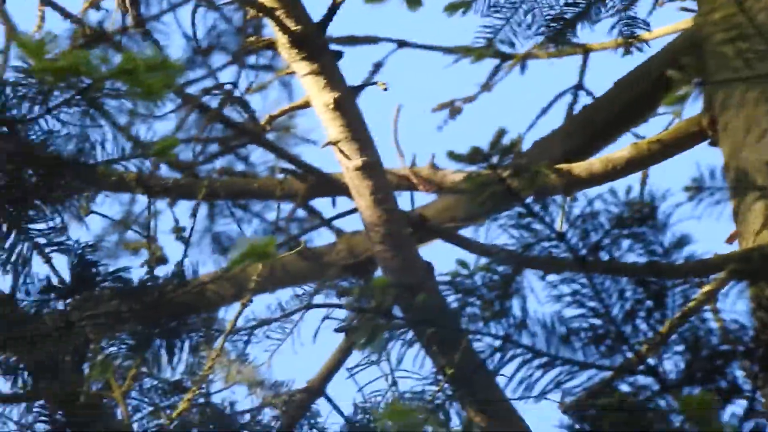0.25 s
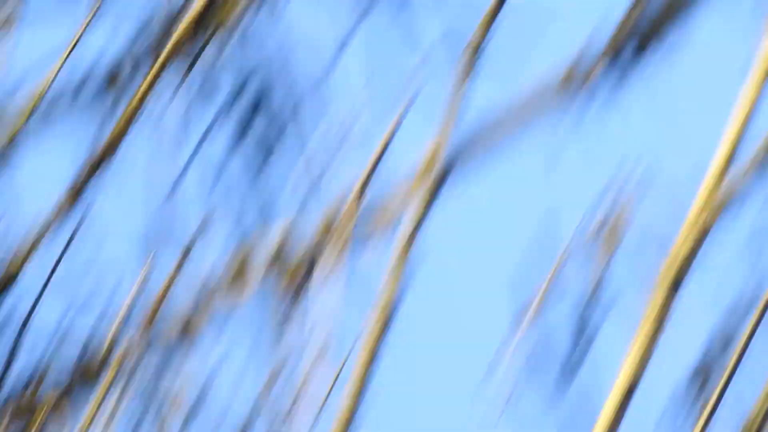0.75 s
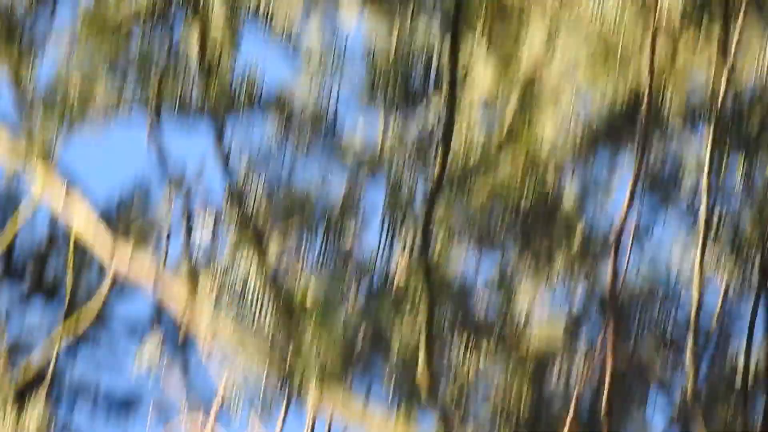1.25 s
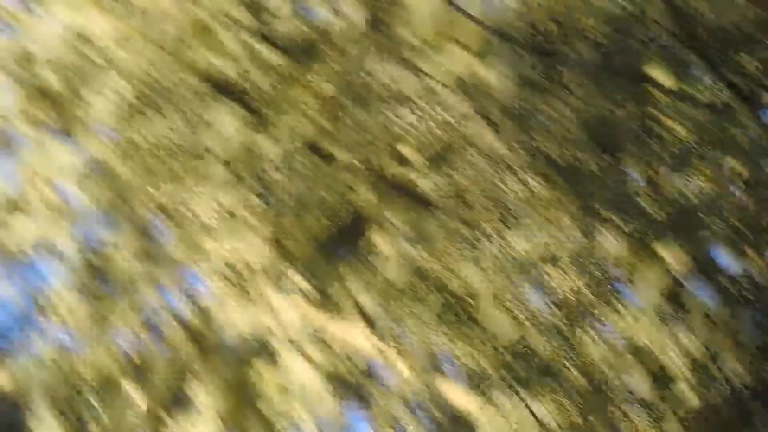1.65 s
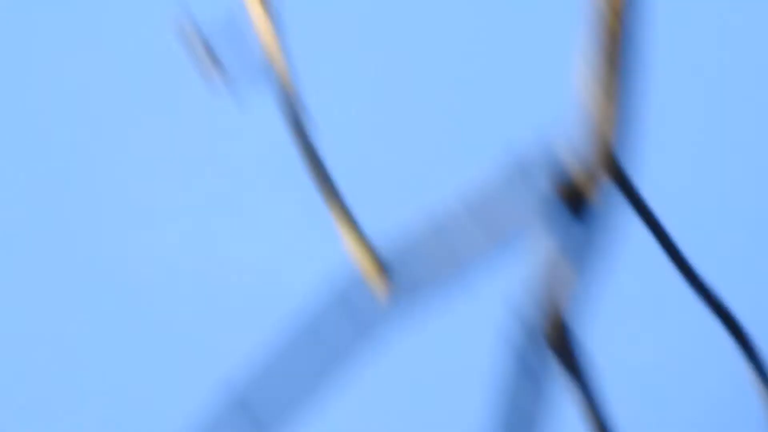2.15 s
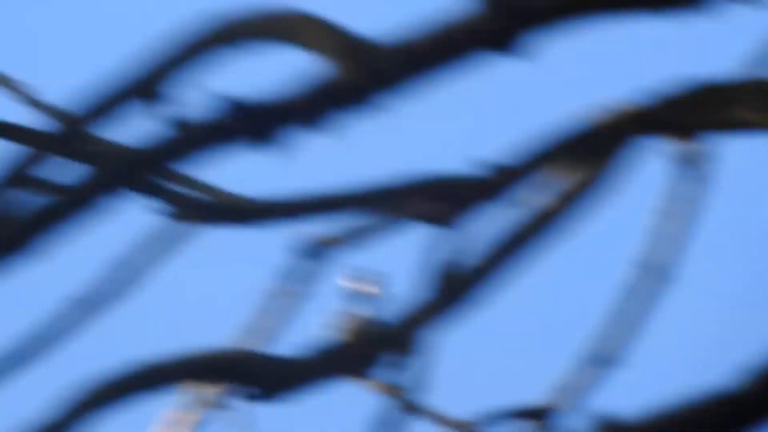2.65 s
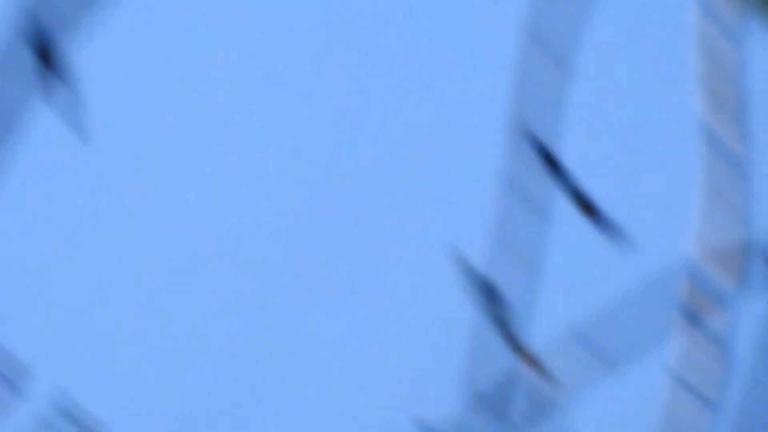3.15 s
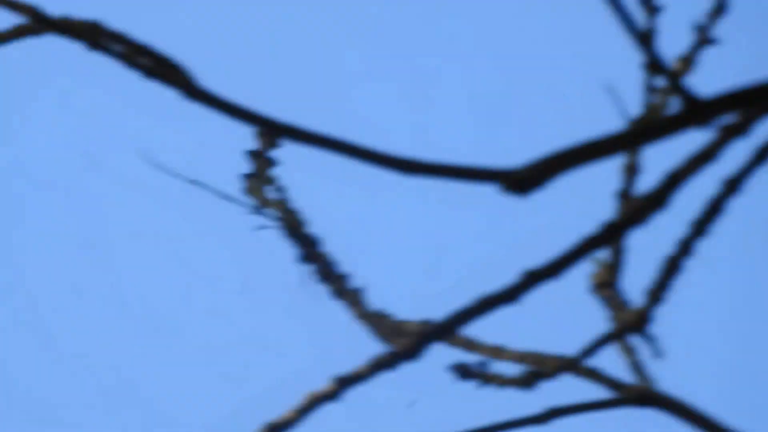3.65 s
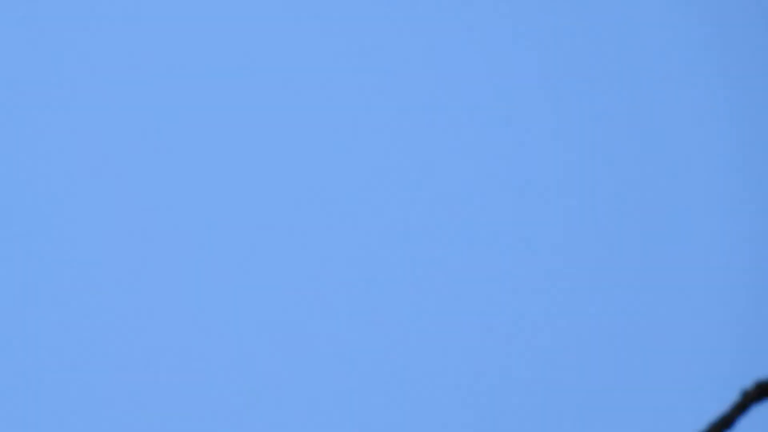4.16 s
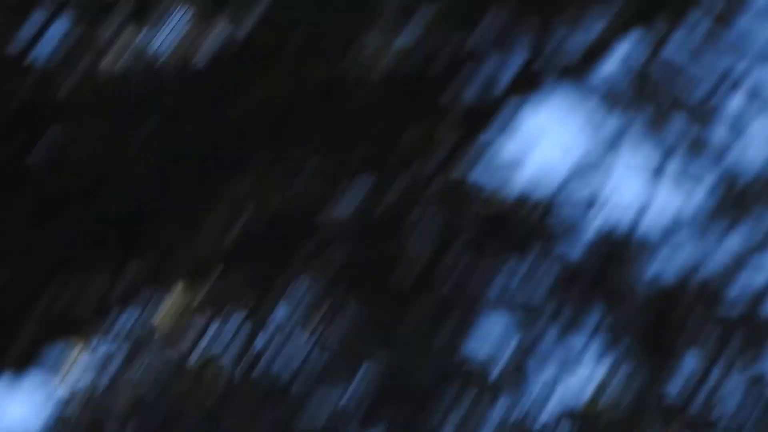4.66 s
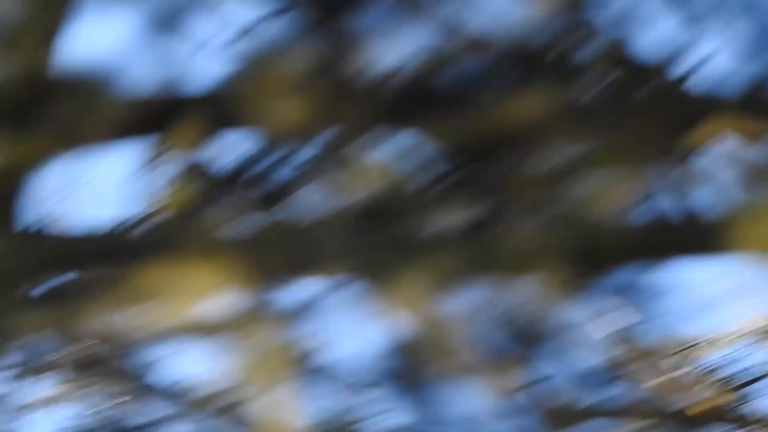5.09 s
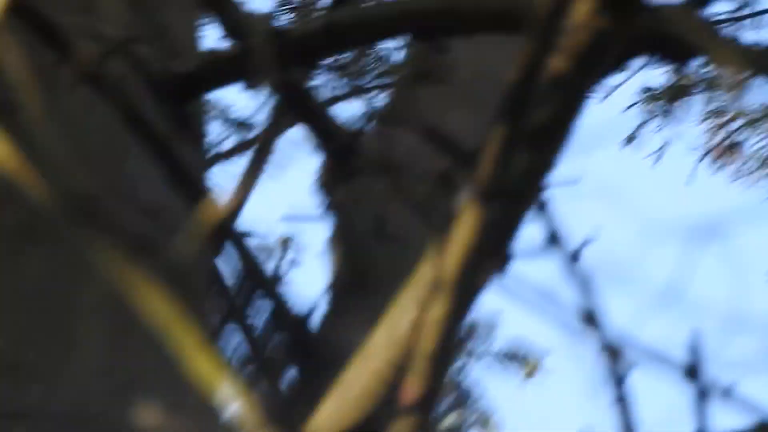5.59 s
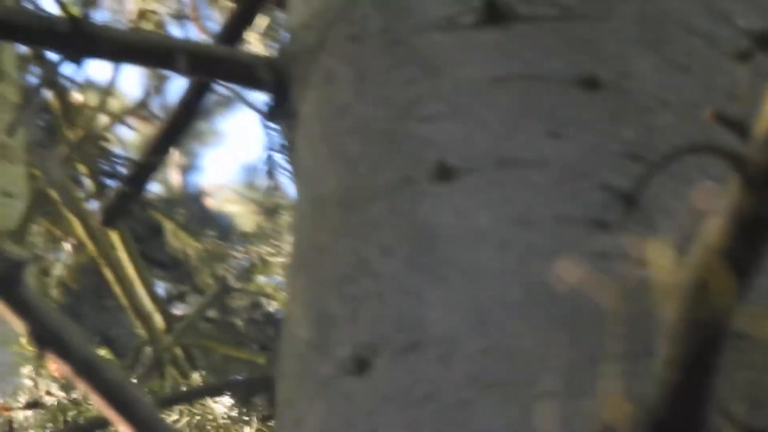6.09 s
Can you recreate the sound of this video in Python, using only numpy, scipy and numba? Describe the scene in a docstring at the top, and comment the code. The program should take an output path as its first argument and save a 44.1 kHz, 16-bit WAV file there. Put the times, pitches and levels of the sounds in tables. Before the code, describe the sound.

A forest opens with a faint hiss of air and distant songbirds giving rising notes, buzzes and twitters. From about 0.5 to 4 seconds one songbird repeats sharp, falling chips three times a second, growing clearer. A faint, far raven croak comes at 2.4 seconds. Then a nearer raven overhead, the loudest sound, gives seven hoarse croaks at about 2.6, 3.1, 3.8, 4.4, 5.1, 5.7 and 6.3 seconds. Each is short, starting as a rattle and swelling into a rough note that rises and falls, echoing briefly among the trees; the later ones are slightly quieter. One soft plop falls at 4.7 seconds. Very high, thin, sinking whistles sound faintly near 1.1 and 4.7 seconds and more clearly at 5.6, joined by quick downward chirps. Underneath runs a low, uneven rumble that throbs, swelling slightly near 1.5 seconds and more from about 4.4 to 6.2.

```python
"""A raven above a forest gives seven hoarse croaks, just after a faint one from far off.
Each croak is a train of pulses from its voice box, ringing in its throat: it starts as a rattle
and swells into a rough note that rises and falls. Trunks and treetops scatter the sound.
A songbird chips three times a second and others whistle and buzz, all with sliding or shaky tones.
With them come one soft plop, a faint hiss of air and a low, uneven rumble that swells and throbs."""
import sys
import numpy as np
from scipy import signal
from scipy.fft import rfft, irfft
from scipy.io import wavfile
from scipy.ndimage import uniform_filter1d, map_coordinates
from numba import njit

SR = 44100
rng = np.random.default_rng(int(sys.argv[2]) if len(sys.argv) > 2 else 0)


def transcribe(signal):
    """Save signal, clipped to [-1, 1], as a 16-bit WAV file at the path in sys.argv[1]."""
    frames = np.atleast_2d(signal).T
    limited = np.clip(frames, -1, 1)
    pcm = np.round(limited * 32767).astype(np.int16)
    wavfile.write(sys.argv[1], SR, pcm)


N = 279135


# The near raven's croaks. Roughness runs from 0 to 1; a throat_ratio above 1 makes it ring higher.
# start_s, end_s, top_pitch_hz, roughness, rasp_db, throat_ratio, level_db
RAVEN_CROAKS = [(2.648, 2.809, 394.5, 0.46, 4, 1.028, -20), (3.111, 3.249, 407, 0.49, 6.5, 1.018, -20),
                (3.829, 3.981, 412.7, 0.5, 0, 0.99, -20), (4.401, 4.564, 405.9, 0.5, 0, 1.047, -22.5),
                (5.111, 5.283, 428.7, .75, -3, 1.015, -24.5), (5.712, 5.866, 416.1, .53, -5, 1.012, -24),
                (6.274, 6.436, 413.3, 0.76, -4, 1.075, -26)]

def raven(swell_db=9, swell_share=0.57, sag_db=2):
    """The near bird calls: each croak swells until just past its middle, then sags a little."""
    out = np.zeros(N)
    for start, end, top_hz, rough, rasp_db, throat_ratio, db in RAVEN_CROAKS:
        voice = croak(start, end, top_hz, rough, rasp_db, throat_ratio)
        progress = np.linspace(0, 1, len(voice))
        swell_left = np.clip(1 - progress / swell_share, 0, 1) ** 1.08
        sag = np.interp(progress, [swell_share, 1], [0, 1])
        add(out, start, voice * gain(db - swell_db * swell_left - sag_db * sag))
    return out


# How the raven's throat boosts or weakens each frequency: frequency_hz, gain_db
THROAT_TONE = [(220, -22.5), (370, -4.5), (560, -9), (810, -5), (1000, -0.5), (1270, 10.5), (1590, -1),
               (2150, -28.5), (2550, -13), (2950, -8), (4100, -12), (6600, -19), (7700, -38.5),
               (13000, -71.5)]

def croak(start, end, top_hz, rough, rasp_db, throat_ratio, bill_db=-2, bill_width_hz=270.):
    """Rattling pulses from the voice box ring in the throat, which brightens as the bill opens."""
    t = clock(end - start)
    progress = t / (end - start)
    source, cycles = voice_box(t, progress, top_hz, rough)
    source = rattle(source, t, progress, rough)
    # fade from a low, dull, closed throat to an open one
    opening = np.clip(progress / 0.42, 0, 1)
    closed_tone = np.array(THROAT_TONE) * [throat_ratio * 0.91, 1]
    open_tone = np.array(THROAT_TONE) * [throat_ratio, 1]
    closed_voice = colour(source * (1 - opening), closed_tone)
    voice = colour(closed_voice, [(2500, 0), (5000, -4)]) + colour(source * opening, open_tone)
    # the bill adds a ring of its own that slides upward
    bill_hz = throat_ratio * (1300 + 480 * progress)
    bill_ring = resonance(source, bill_hz, bill_width_hz)
    voice += gain(bill_db) * resonance(bill_ring, bill_hz, bill_width_hz)
    voice = colour(voice, [(2500, 0), (6000, rasp_db)])
    # the lowest tone stays smooth under the rattle and is fuller in the harsher calls
    lowest_tone = unit(np.sin(2 * np.pi * cycles))
    voice = unit(voice) + gain(-21 + .5 * rasp_db) * lowest_tone
    fade_out = np.clip((t[-1] - t) / 0.012, 0, 1)
    return voice * fade_out


def voice_box(t, progress, top_hz, rough, arch_depth=.17):
    """One pulse and one puff of air per vibration; returns the sound and the running cycle count."""
    arch = 1 - arch_depth * np.interp(progress, [0, .57, 1], [1, 0, 1]) ** 2  # pitch rises, then falls
    wobble = rough * (.085 * wander(t, 420) + .035 * wander(t, 55))
    cycles = np.cumsum(top_hz * arch * (1 + wobble)) / SR
    pulses = np.diff(np.floor(cycles), prepend=0) * np.exp(.5 * rough * wander(t, 330))
    puffs = np.exp(-(cycles % 1) / .45) * rng.standard_normal(len(t))
    puffs = colour(puffs, [(600, -11), (1500, 0)])
    return unit(pulses) + .55 * unit(puffs), cycles


def rattle(source, t, progress, rough, rattle_hz=82, growl_hz=49):
    """Chops the voice: deeply and fast at first, then easing into a slower, uneven growl."""
    rate_hz = np.interp(progress, [0, .45], [rattle_hz, growl_hz])
    rate_hz *= 1 + 0.25 * progress * wander(t, 45)
    phase = (np.cumsum(rate_hz) / SR) % 1
    depth = np.interp(progress, [0, .25, .5, 1], [.97, .7, 0.77 * rough, 0.29 * rough])
    gate = 1 - depth + depth * np.exp(-((phase - .4) / .3) ** 2)
    return source * gate / np.sqrt(uniform_filter1d(gate ** 2, size=1200))  # keeps the loudness even


def far_raven(start=2.37, end=2.6, db=-48):
    """One faint, swelling croak from beyond the trees."""
    out = np.zeros(N)
    voice = croak(start, end, top_hz=400, rough=.6, rasp_db=0, throat_ratio=1.03)
    add(out, start, gain(db) * voice * np.linspace(.3, 1.3, len(voice)))
    return out


# One songbird's steady run of chips: start_s, landing_pitch_hz, level_db
SONGBIRD_CHIPS = [(0.548, 4320, -56.5), (0.908, 5200, -45), (1.275, 4178, -43.5), (1.598, 5165, -39),
                  (1.959, 3824, -41.5), (2.289, 4560, -36.5), (2.614, 5270, -38), (2.967, 3840, -40.5),
                  (3.301, 4657, -39.5), (3.611, 5140, -36.5), (3.979, 4215, -38.5)]
# Other birds' quick downward flicks: start_s, length_s, from_hz, toward_hz, level_db
BIRD_FLICKS = [(1.091, 0.049, 5008, 3200, -55.5), (1.151, 0.044, 4800, 3590, -58),
               (4.359, 0.00288, 8630, 6220, -45), (5.658, 0.0096, 8464, 4170, -41),
               (5.747, .052, 7920, 4000, -38)]

def chips(chip_from_hz=7450, fall_s=.0068, chip_cycles=225):
    """Sharp falling notes from songbirds in the treetops."""
    out = np.zeros(N)
    for start, hz, db in SONGBIRD_CHIPS:
        add(out, start, chip(chip_cycles / hz, chip_from_hz, hz, fall_s, db))
        if hz > 4950:  # chips that land high break off into a second drop
            add(out, start + .034, chip(length=0.013, from_hz=hz, to_hz=3020, fall_s=fall_s, db=db - 1.5))
    for start, length, from_hz, to_hz, db in BIRD_FLICKS:
        add(out, start, chip(length, from_hz, to_hz, fall_s=.4 * length, db=db))
    return out


def chip(length, from_hz, to_hz, fall_s, db):
    """One sharp falling note that fades as it levels out."""
    note = glide(length, from_hz, to_hz, fall_s, db, waver=0.011, fade=0.096)
    return note * np.linspace(1.5, .3, len(note))


# Long, thin, sinking whistles: start_s, length_s, from_hz, toward_hz, level_db
HIGH_WHISTLES = [(1.134, 0.65, 8590, 7800, -54), (4.68, .45, 8460, 7470, -62),
                 (5.618, 0.52, 8520, 7678, -41)]

def whistles(sink_s=0.24):
    """Very high, trembling songbird whistles that are loudest early on and then die away."""
    out = np.zeros(N)
    for start, length, from_hz, to_hz, db in HIGH_WHISTLES:
        tone = glide(length, from_hz, to_hz, sink_s, db, waver=.0074, fade=.1)
        swell_db = np.interp(np.linspace(0, 1, len(tone)), [0, 0.39, 1], [-13, 0, -16])
        add(out, start, tone * gain(swell_db))
    return out


# A far songbird's rising notes: start_s, level_db
RISING_NOTES = [(0.047, -50.5), (0.129, -49.5), (0.639, -47.5), (0.809, -47.5), (1.19, -50), (1.372, -46.5),
                (1.69, -47), (1.86, -47), (2.248, -50.5)]
# Far buzzy notes: start_s, length_s, pitch_hz, pitch_spread_hz, level_db
BUZZY_NOTES = [(-.08, 0.15, 5240, 614, -46.5), (0.176, 0.16, 6580, 1092, -49.5),
               (0.274, 0.12, 2317, 118, -49.5), (0.928, 0.13, 3030, 200, -51),
               (2.423, .14, 5870, 2235, -47.5), (2.438, 0.1, 2895, 250, -46),
               (4.883, 0.122, 3420, 237, -54), (5.015, 0.1, 6160, 250, -50), (5.393, 0.254, 4400, 199, -57),
               (5.86, 0.072, 6450, 405, -47)]

def far_songbirds():
    """Birds deeper in the wood: notes that slide up, and notes whose pitch shakes so fast they buzz."""
    out = np.zeros(N)
    for start, db in RISING_NOTES:
        note = glide(length=0.084, from_hz=2300, to_hz=3450, slide_s=.075, db=db, waver=0.021, fade=0.54)
        add(out, start, note)
    for start, length, hz, spread_hz, db in BUZZY_NOTES:
        t = clock(length)
        shaky_hz = hz + spread_hz / 2 * wander(t, 500)
        buzz = np.sin(2 * np.pi * np.cumsum(shaky_hz) / SR)
        add(out, start, gain(db) * buzz * signal.windows.tukey(len(t), .6))
    return out


def chorus(count=30, db=-61, spread_db=2):
    """Faint twitters of many birds far off, each a tiny slide at a random time and pitch."""
    out = np.zeros(N)
    for when, pitch, slope, loudness in rng.random((count, 4)):
        to_hz = 2300 + 1900 * pitch
        from_hz = to_hz * (0.89 + 0.6 * slope)
        note_db = db + spread_db * (2 * loudness - 1)
        add(out, when * N / SR, glide(0.057, from_hz, to_hz, slide_s=0.014, db=note_db, fade=1.0))
    return out


# A soft falling plop: start_s, length_s, from_hz, toward_hz, fall_s
SOFT_PLOP = (4.669, .021, 1450, 110, .0042)

def plop():
    """One very short tone that dies as it drops."""
    out = np.zeros(N)
    start, length, from_hz, to_hz, fall_s = SOFT_PLOP
    note = glide(length, from_hz, to_hz, fall_s, db=-33, fade=.15)
    add(out, start, note * np.linspace(1, .4, len(note)))
    return out


# The tone of the air's hiss: frequency_hz, gain_db
AIR_TONE = [(20, -38.5), (65, -5), (170, -8.5), (270, -11), (450, -11.5), (800, -13.5), (1300, -18.5),
            (2000, -21.5), (2900, -17), (3700, -22), (6300, -24.5), (8000, -32.5), (11000, -38.5),
            (15500, -44.5)]
# The tone of the rumble: frequency_hz, gain_db
RUMBLE_TONE = [(35, -35), (70, -9.5), (105, 1), (150, 9), (190, 7), (250, -21), (400, -51)]
# How the rumble rises and falls: time_s, level_db
RUMBLE_SWELLS = [(0, -46.5), (1.05, -45.5), (1.45, -41), (2.0, -48), (3.6, -50.5), (4.4, -41),
                 (4.68, -37.5), (4.95, -40), (5.5, -36), (5.92, -46.3), (6.17, -39.5), (6.33, -59)]

def background(air_db=-49, rumble_db=-5.5, rumble_side_db=-11.5, throb_db=2.5):
    """Noise shaped into faint air in the trees and an uneven low rumble, as mid and side."""
    t = np.arange(N) / SR
    air = np.array([unit(colour(rng.standard_normal(N), AIR_TONE)) for _ in range(2)])
    rumble = np.array([unit(colour(rng.standard_normal(N), RUMBLE_TONE)) for _ in range(2)])
    rumble[1] *= gain(rumble_side_db)
    swell_db = np.interp(t, *np.transpose(RUMBLE_SWELLS)) + throb_db * wander(t, 14)
    return air * gain(air_db + .5 * wander(t, 3.63)) + rumble * gain(rumble_db + swell_db)


def forest(x, direct_db, trunks_db, tail_db, side_db=0, twigs_db=-3, tail_s=1.7, treble_tail_s=4.2):
    """Adds echoes from twigs, trunks and far trees, as mid and side; side_db is low for a bird overhead."""
    t = clock(1.4)
    lowpass, highpass = (signal.butter(2, 2500, kind, fs=SR, output="sos") for kind in ("low", "high"))
    channels = []
    for early_db, late_db in ((0, 0), (side_db, -3)):  # mid, then side
        # twigs and needles are small, so they smear only the treble
        twigs = signal.sosfilt(highpass, rng.standard_normal(len(t))) * np.exp(-t / 0.0013)
        # near trunks send back about 900 separate echoes a second
        trunks = rng.standard_normal(len(t)) * (rng.random(len(t)) < 900 / SR)
        trunks *= np.exp(-t / 0.039) * (t > .002)
        noise = rng.standard_normal(len(t))
        low_tail = signal.sosfilt(lowpass, noise) * gain(-60 * t / tail_s)
        high_tail = signal.sosfilt(highpass, noise) * gain(-60 * t / treble_tail_s)
        # the tail builds up, then comes back in patches from separate stands of trees
        tail = (low_tail - high_tail) * (1 - np.exp(-t / 0.034)) * gain(2 * wander(t, 19.7))
        echoes = gain(twigs_db) * unit(twigs) + gain(trunks_db + early_db) * unit(trunks)
        echoes += gain(tail_db + late_db) * unit(tail)
        scattered = signal.fftconvolve(x, echoes / np.sqrt(len(t)))[:N]
        channels.append(gain(direct_db + early_db) * x + scattered)
    return np.array(channels)


def glide(length, from_hz, to_hz, slide_s, db, waver=0.009, fade=0.067):
    """A pure note that slides ever more slowly toward to_hz; fade is the share spent fading in and out."""
    t = clock(length)
    hz = to_hz + (from_hz - to_hz) * np.exp(-t / slide_s)
    hz *= 1 + waver * wander(t, 350)
    tone = np.sqrt(2) * np.sin(2 * np.pi * np.cumsum(hz) / SR)
    return gain(db) * signal.windows.tukey(len(t), fade) * tone


def colour(x, points, size=2048):
    """Filters a sound by (frequency_hz, gain_db) points, so that the peaks ring after each pulse."""
    cepstrum = irfft(np.log(response(points, size)))
    # folding the second half onto the first puts all the ringing after the pulse
    cepstrum[1:size // 2] *= 2
    cepstrum[size // 2 + 1:] = 0
    ring = irfft(np.exp(rfft(cepstrum)))
    return signal.fftconvolve(x, ring)[:len(x)]


def response(points, size):
    """Joins (frequency_hz, gain_db) points into a gain for every frequency of a spectrum."""
    hz, db = np.transpose(points)
    bin_hz = np.arange(size // 2 + 1) * SR / size
    return gain(np.interp(np.log(bin_hz + 1), np.log(hz), db))


@njit
def resonance(x, hz, width_hz):
    """Lets through a band of frequencies whose centre can move."""
    y, band_state, low_state = np.empty(len(x)), 0., 0.
    for i in range(len(x)):
        tuning, damping = np.tan(np.pi * hz[i] / SR), width_hz / hz[i]
        band = (band_state + tuning * (x[i] - low_state)) / (1 + tuning * (tuning + damping))
        band_state = 2 * band - band_state
        low_state += 2 * tuning * band
        y[i] = damping * band
    return y


def wander(t, rate_hz):
    """A smooth random curve that strays about 1 either side of zero."""
    knots = rng.standard_normal(int(t[-1] * rate_hz) + 4)
    return map_coordinates(knots, [t * rate_hz + 1], order=3, mode="nearest")


def gain(db):
    """Turns decibels into a multiplier."""
    return 10 ** (np.asarray(db) / 20)


def unit(x):
    """Scales a sound to an average (rms) level of 1."""
    return x / np.sqrt(np.mean(x ** 2))


def clock(length):
    """Sample times of a short sound, in seconds."""
    return np.arange(int(length * SR)) / SR


def add(track, start, sound):
    """Mixes a sound in at a start time in seconds."""
    at = int(start * SR) + np.arange(len(sound))
    inside = (at >= 0) & (at < N)
    track[at[inside]] += sound[inside]


# How much left and right differ for sound from all round: frequency_hz, side_gain_db
STEREO_WIDTH = [(60, -7.5), (200, -8), (700, -13.5), (1300, -10), (2400, -6.5), (4400, -2), (8000, 2),
                (15000, -3)]

def scene():
    """Mixes the forest in stereo: mid is what left and right share, side is how they differ."""
    mix = forest(raven(), direct_db=-3, trunks_db=-5, tail_db=-13.5, side_db=-11, twigs_db=-11.5,
                 tail_s=1.36, treble_tail_s=2.1)
    mix += forest(far_raven(), direct_db=1, trunks_db=-2, tail_db=4.5, side_db=-2,
                  tail_s=1.2, treble_tail_s=3.5)
    mix += forest(chips(), direct_db=-4.5, trunks_db=-1, tail_db=-3, side_db=1.5, twigs_db=-18,
                  treble_tail_s=1.08)
    mix += forest(whistles(), direct_db=-6.5, trunks_db=-8.5, tail_db=-23, side_db=-10, twigs_db=-10,
                  treble_tail_s=0.44)
    mix += forest(far_songbirds() + chorus(), direct_db=-2.5, trunks_db=-10.5, tail_db=-3, twigs_db=-7.5,
                  treble_tail_s=1.14)
    mid, side = mix + background() + plop()
    # the side is a difference in air pressure, so 1j turns it a quarter cycle from the mid
    side = irfft(1j * rfft(side) * response(STEREO_WIDTH, N), N)
    return np.array([mid + side, mid - side])


def record(dry):
    """Cuts away the very highest treble, above 15700 Hz."""
    return signal.sosfilt(signal.ellip(10, .2, 80, 15700, fs=SR, output="sos"), dry)


dry = scene()
out = record(dry)
transcribe(out)
```